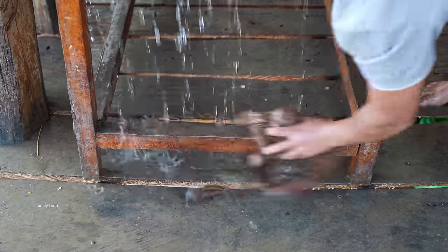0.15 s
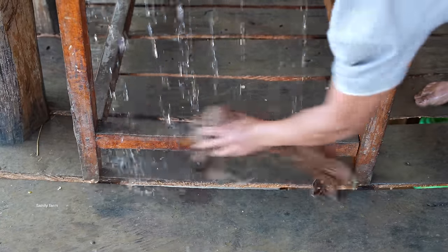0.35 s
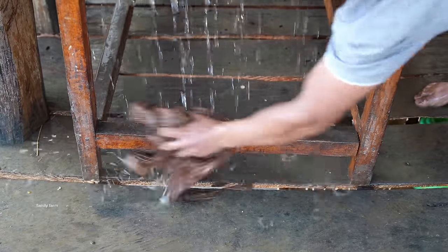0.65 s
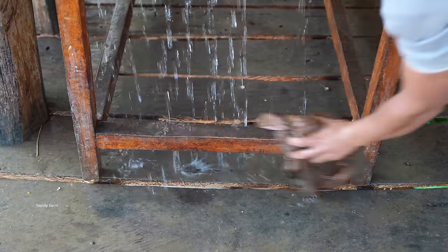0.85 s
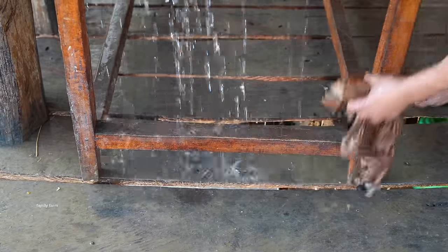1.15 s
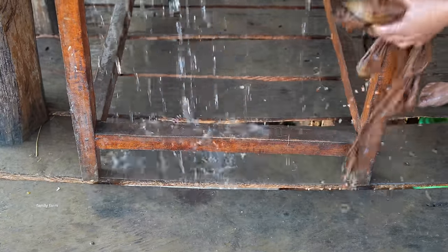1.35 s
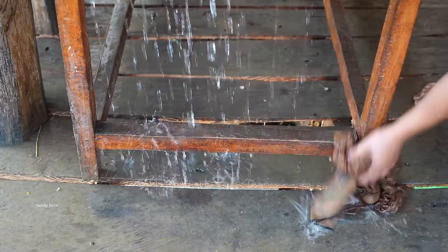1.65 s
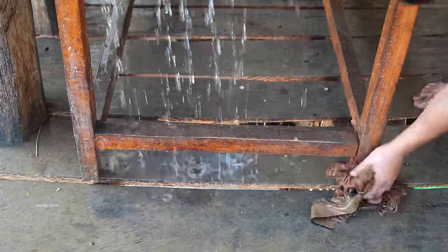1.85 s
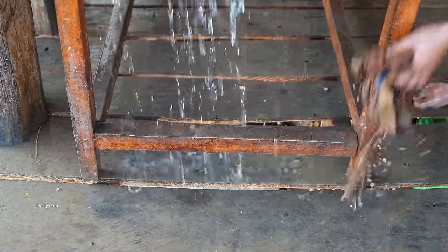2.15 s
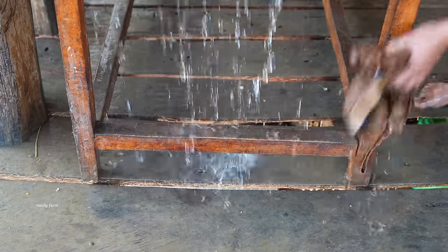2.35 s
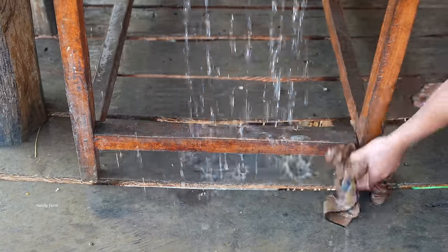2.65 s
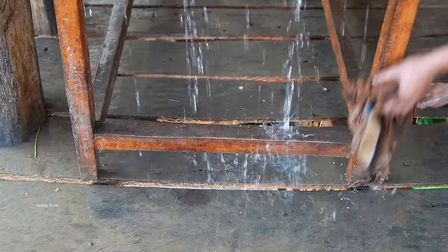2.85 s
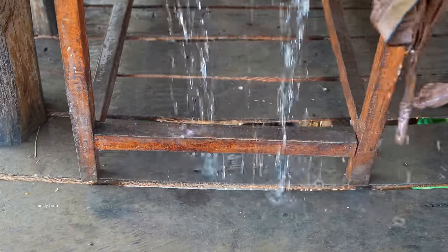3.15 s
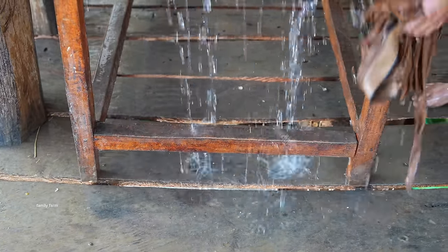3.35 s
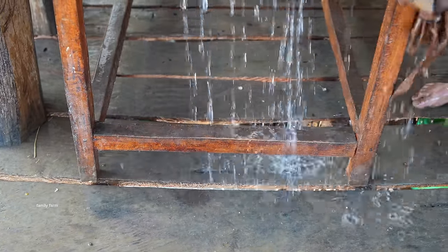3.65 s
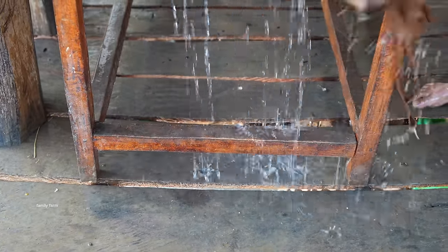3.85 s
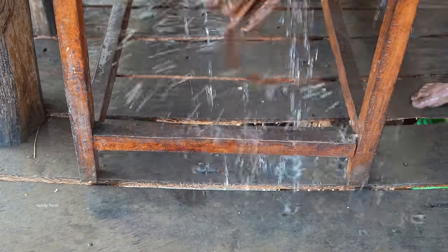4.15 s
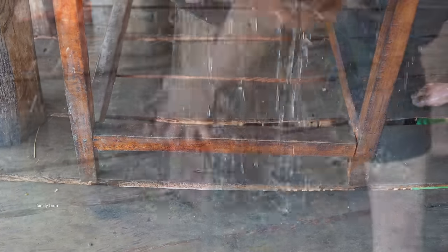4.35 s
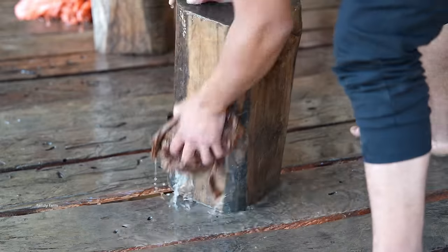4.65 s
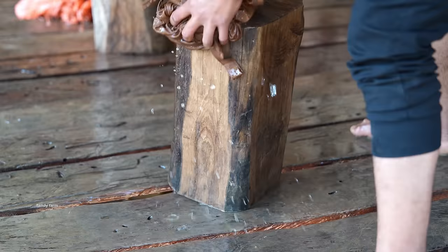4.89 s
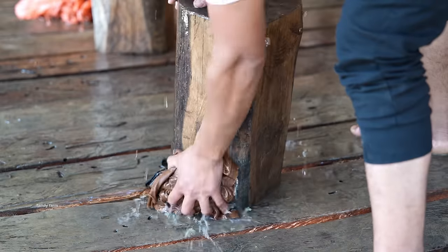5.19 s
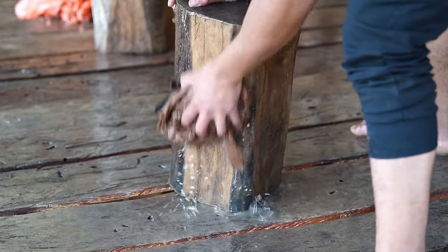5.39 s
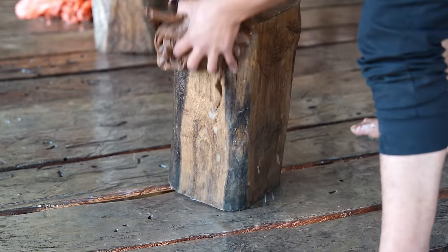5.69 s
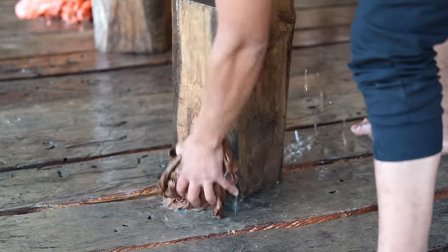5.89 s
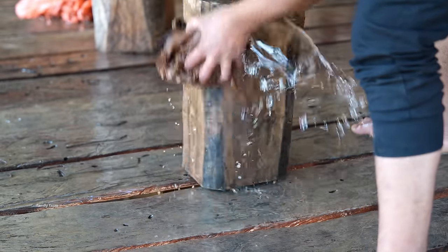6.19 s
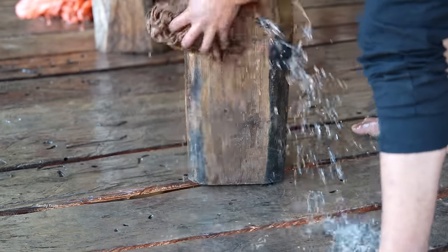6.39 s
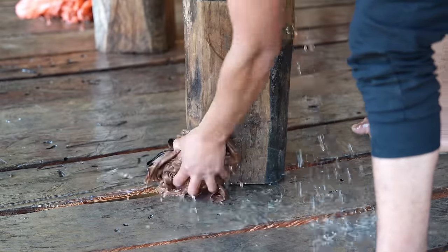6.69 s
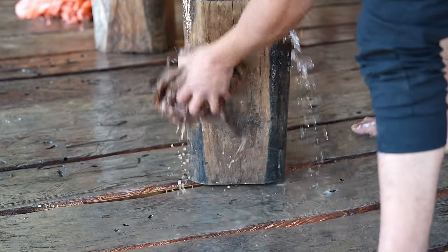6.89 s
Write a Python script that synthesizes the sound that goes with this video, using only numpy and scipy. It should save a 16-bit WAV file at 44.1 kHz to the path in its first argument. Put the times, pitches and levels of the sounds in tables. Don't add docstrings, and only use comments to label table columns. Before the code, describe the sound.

Outdoors on a covered plank veranda, hose water drums on a wooden table and floor, with close drops slapping, ticking and knocking while a wet rag wipes the wood. Low gusts of wind rumble against the microphone. After a few dull wood bumps the water swings away, leaving faint trickle, a wet rag slapping a log and flinging droplets, a nearby hen clucking and thin chick peeps.

```python
import sys
import numpy as np
from scipy import signal
from scipy.fft import rfft, irfft, next_fast_len
from scipy.io import wavfile
from scipy.ndimage import uniform_filter1d, minimum_filter1d, map_coordinates

SR = 44100
rng = np.random.default_rng(int(sys.argv[2]) if len(sys.argv) > 2 else 0)


def ratio_of_db(decibels):
    return 10 ** (np.asarray(decibels, float) / 20)


def persist_wave(psi):
    counts = np.round(np.clip(psi, -1, 1) * 32767).astype(np.int16)
    wavfile.write(sys.argv[1], SR, np.atleast_2d(counts).T)


N = 310023
TIME = np.arange(N) / SR
CHANGE_S = 4.69


def unit(x):
    return x / np.sqrt(np.mean(x ** 2) + 1e-20)


def curves(rows):
    s, *cols = np.transpose(rows)
    return [np.interp(TIME, s, c) for c in cols]


def swells(events, width_s):
    return sum(db * np.exp(-((TIME - s) / width_s) ** 2 / 2) for s, db in events)


def wobble(knots_per_s):
    knots = rng.standard_normal(int(N * knots_per_s / SR) + 4)
    return map_coordinates(knots, [TIME * knots_per_s])


def coloured(x, spectrum):
    m = 2 * next_fast_len(N // 2 + SR // 2)
    hz, db = np.transpose(spectrum)
    grid_hz = np.fft.rfftfreq(m, 1 / SR)
    gain_db = np.interp(np.log(grid_hz + 1), np.log(hz + 1), db)
    ceps = irfft(np.log(ratio_of_db(gain_db) + 1e-4), m)
    ceps[1:m // 2] *= 2
    ceps[m // 2 + 1:] = 0
    return irfft(rfft(x, m) * np.exp(rfft(ceps)), m)[:N]


def fading(x, t60_s):
    return signal.lfilter([1], [1, -ratio_of_db(-60 / (t60_s * SR))], x)


def drops(rate_per_s, spread_db):
    hits = rng.random(N) < rate_per_s / SR
    return hits * ratio_of_db(spread_db * np.minimum(rng.exponential(size=N), 4))


def patches(x, depth_db):
    z = signal.stft(x, nperseg=256)[2]
    field = uniform_filter1d(rng.standard_normal(z.shape), size=4, axis=0)
    field = uniform_filter1d(field, size=14, axis=1)
    return signal.istft(z * ratio_of_db(depth_db * unit(field)), nperseg=256)[1][:N]


def room(x, t60_s):
    t = TIME[:SR // 2]
    tail = rng.standard_normal(len(t)) * ratio_of_db(-60 * t / t60_s)
    return signal.fftconvolve(x, tail / np.linalg.norm(tail))[:N]


# start_s, level_db, small_over_big_eddies_db
WIND = [(0.0, -20, 9.5), (0.15, -45.5, 10), (0.33, -31.5, 2), (0.57, -26, -12.5), (0.62, -16, 4),
        (0.92, -24, -0.5), (2.08, -23, -0.5), (2.11, -21, -9), (2.43, -8.5, -2), (2.58, -42, -3),
        (3.41, -32.5, -4.5), (4.11, -48.5, -10), (4.32, -14, 5), (5.66, -14, 5.5), (5.8, -25.5, -5),
        (5.95, -11, 5.5), (6.99, -44, 2.5), (7.03, -36, -5)]
# start_s, over_strength_db
PUFFS = [(.42, 8.5), (.87, 10), (1.13, -10), (1.35, 0.5), (1.6, -3.5), (1.88, 3), (2.55, 12), (2.85, 8),
         (3.5, 5), (3.64, -12.5), (3.8, 1), (4.03, 12.5), (4.65, -1.5), (4.82, 4), (5.0, 0), (5.58, -3.5),
         (6.15, -0.5), (6.28, 5.5), (6.7, 8.5)]
# freq_hz, density_db_per_hz
HEAVE = [(2.4, -38), (4.0, 3), (24, -3), (31, -36.5), (53, -120)]
BUFFET = [(13, -41.5), (22, 10.5), (34, 3), (66, -14), (86, -23), (150, -120)]
THUD = [(35, -31.5), (60, -2), (94, -3), (156, -22), (205, -29), (240, -28.5), (310, -93), (530, -120)]
# usual_level_db, growth_db_per_db, eddy_share_db_per_db
GUSTING = [
    (-12, 0.58, -0.59),
    (-17.5, 0.88, 0.11),
    (-35.5, 0.47, 0.97),
]
USUAL_DB = -20


def wind():
    strength_db, eddy_db = curves(WIND)
    puff_db = swells(PUFFS, width_s=0.041)
    x = np.zeros(N)
    for (usual_db, grows, share), colour, lump_db in zip(GUSTING, (HEAVE, BUFFET, THUD), (1.5, 3.5, 4.5)):
        level_db = usual_db + puff_db + grows * (strength_db - USUAL_DB) + share * eddy_db
        noise = coloured(rng.standard_normal(N), colour)
        x += ratio_of_db(level_db) * unit(ratio_of_db(lump_db * wobble(17)) * noise)
    return x


# start_s, flow_db, spray_fineness_db
WATER = [(0, 4, -5.5), (.8, 1.5, -4.5), (1.3, 1, -3), (1.7, 3.5, -5.5), (2.5, 2, -1), (3.05, -0.5, -2.5),
         (3.4, -1.5, 4.5), (3.85, 2.5, -2), (4.35, 4, -5), (4.68, -2.5, 2.5), (4.7, -14.5, 0),
         (5.1, -13, -4.5), (5.6, -17, 0.5), (6.05, -14, -6.5), (6.4, -18, 1.5), (7.03, -19.5, -2.5)]
# start_s, depth_db
LULLS = [(.25, 4.5), (.58, 2.5), (1.0, 4.5), (1.421, 6), (1.88, 6.5), (2.3, 4.5), (2.68, 8), (3.27, 0),
         (3.55, 0), (4.15, 4.5)]


def stream():
    flow_db, fine_db = curves(WATER)
    return flow_db, fine_db, swells(LULLS, width_s=0.059)


def shower(colour, shared, rate_per_s, spread_db, t60_s, hiss, patchy_db):
    trail = unit(fading(shared + drops(rate_per_s, spread_db), t60_s)) * rng.standard_normal(N)
    blur = hiss * ratio_of_db(1.0 * wobble(14)) * patches(rng.standard_normal(N), patchy_db)
    return unit(coloured(blur + trail, colour))


# freq_hz, density_db_per_hz
PLANKS = [(65, -23), (110, 4), (129, -5), (162, -2), (464, -5.5), (1200, -7.5), (1560, -41), (2640, -120)]
PUDDLE = [(650, -24), (1100, -9), (1590, -7.5), (2200, -13.5), (2860, -31), (4840, -120)]
SPLASH = [(1240, -16.5), (2100, -3.5), (3350, 4.5), (4520, -5), (5200, -13.5), (6760, -7), (11400, -120)]
SPRAY = [(2710, -11.5), (4600, -8), (5030, -1.5), (6740, -1), (7490, 0.5), (14900, -12.5), (15700, -20),
         (16300, -32)]
# level_db, lull_share_db_per_db, fineness_share_db_per_db
SHOWERS = [
    (-37, 0.86, 0.11),
    (-41, 1.73, -0.58),
    (-35.5, 0.96, 0.42),
    (-39, 0.11, 1.0),
]


def showers():
    flow_db, fine_db, lull_db = stream()
    levels_db = [db + flow_db - dip * lull_db + fine * fine_db for db, dip, fine in SHOWERS]
    planks_db, puddle_db, splash_db, spray_db = levels_db
    big = drops(60, 6.4)
    x = ratio_of_db(planks_db + 1.5) * shower(PLANKS, 0.47 * big, rate_per_s=120, spread_db=4.0, t60_s=0.16,
                                      hiss=1.5, patchy_db=2.5)
    x += ratio_of_db(puddle_db) * shower(PUDDLE, 0.67 * big, rate_per_s=290, spread_db=6.5, t60_s=0.053,
                                 hiss=1.24, patchy_db=4.5)
    x += ratio_of_db(splash_db + 1.0) * shower(SPLASH, 1.17 * big, rate_per_s=170, spread_db=6.0, t60_s=0.03,
                                       hiss=1.62, patchy_db=3.5)
    spray = shower(SPRAY, 0.4 * big, rate_per_s=260, spread_db=3.2, t60_s=0.007,
                   hiss=0.8, patchy_db=1.5)
    dull = unit(signal.lfilter(*signal.butter(2, 8000, fs=SR), spray))
    return x + ratio_of_db(spray_db + 1.5) * np.where(TIME < CHANGE_S, spray, dull)


# rate_per_s, usual_hz, spread_octaves, ring_cycles, over_flow_db
DROPLETS = [
    (154, 7200, .45, 4.6, -44.5),
    (71.3, 3020, 0.33, 8.3, -39.5),
    (38.7, 1100, 0.573, 16.3, -39),
]


def spatter():
    flow_db, _, lull_db = stream()
    x, t = np.zeros(N + SR), TIME[:700]
    for rate_per_s, usual_hz, octaves, cycles, db in DROPLETS:
        draw = rng.random((2000, 3))[:round(rate_per_s * N / SR)]
        at = (draw[:, 0] * (N - 1)).astype(int)
        hz = np.minimum(usual_hz * 2 ** (octaves * 3.43 * (draw[:, 1:2] - 0.5)), 15000)
        size_db = db + (flow_db - lull_db)[at] - 3.8 * np.log(draw[:, 2] + 0.046)
        decay = ratio_of_db(-60 * t * hz / (3 * cycles))
        plink = ratio_of_db(size_db)[:, None] * decay * np.sin(2 * np.pi * hz * t)
        x += np.bincount((at[:, None] + np.arange(len(t))).ravel(), plink.ravel(), N + SR)
    return x[:N]


def blows(events, colour, cycles, tail_db, sharp):
    x, t = np.zeros(N + SR), TIME[:SR // 4]
    grains = 5.1 + fading(drops(400, 4.85), 0.028)
    carrier = unit(coloured(rng.standard_normal(N) * grains, colour))
    carrier = np.pad(carrier, (0, SR), "wrap")
    for start_s, db, hz, t60_s in events:
        part = carrier[round(start_s * SR):][:len(t)]
        patter = 0.9 * part + unit(signal.lfilter(*signal.iirpeak(hz, sharp, SR), part))
        decay = ratio_of_db(4 + 60 / cycles - 60 * t * hz / cycles)
        ring = decay * (1 - np.exp(-t * hz)) * np.sin(2 * np.pi * hz * t)
        tail = ratio_of_db(tail_db - 60 * t / max(t60_s, 0.02)) * patter
        x[round((start_s + 0.0008) * SR):][:len(t)] += ratio_of_db(db) * (ring + tail)
    return x[:N]


def wood_blows(events):
    return blows(events, PLANKS[:-2] + PUDDLE[2:], cycles=26, tail_db=-16, sharp=5)


def splash_blows(events):
    return blows(events, SPLASH, cycles=7.5, tail_db=-21, sharp=3.1)


def spray_blows(events):
    return blows([(*event, 0.07) for event in events], SPRAY, cycles=8, tail_db=-21, sharp=3)


def cracks(events, top_hz):
    start_s, db = np.transpose(events)
    at = np.round((start_s + 0.0008) * SR).astype(int)
    spikes = np.bincount(at, ratio_of_db(db + 6), N)
    snap = (fading(spikes, 0.002) + 0.056 * fading(spikes, 0.061)) * np.sign(rng.standard_normal(N))
    return signal.lfilter(*signal.butter(2, [8000, top_hz], "band", fs=SR), snap)


# start_s, peak_db, ring_hz
SLAPS = [(0.168, -12, 3670), (0.416, -15, 3380), (0.5202, -11, 3100), (0.575, -10.5, 3300),
         (0.7056, -12.5, 3600), (0.8924, -8.5, 2770), (1.4288, -16.5, 3460), (1.509, -12.5, 3700),
         (1.6556, -12, 3500), (1.6672, -9.5, 2680), (1.8072, -12.5, 3270), (1.998, -18, 4010),
         (2.0483, -6.5, 3130), (2.2461, -12.5, 3540), (2.353, -14.5, 2360), (2.4646, -9, 2980),
         (2.478, -10.5, 2870), (2.4847, -13.5, 2950), (2.702, -16, 3600), (2.7295, -14, 3420),
         (2.7966, -9.5, 2760), (3.1589, -9.5, 3500), (3.342, -12.5, 3700), (3.3645, -12, 3830),
         (3.4533, -16.5, 3640), (3.6349, -8.5, 2380), (3.6432, -9, 3260), (3.7486, -8.5, 3600),
         (4.5012, -15, 3640), (4.5955, -14, 3210),
         (0.0662, -20, 2420), (0.309, -19, 2430), (0.3134, -17, 2380), (1.1019, -22, 3040),
          (1.1318, -26, 3090), (1.273, -19, 3550), (1.2784, -19, 3260), (1.6365, -17, 3100),
          (1.6958, -20, 2450), (2.306, -22, 2470), (2.3231, -19, 3910), (2.4219, -25, 3420),
          (2.5282, -18, 2860), (3.266, -31, 3660), (3.3544, -16, 3860), (3.4328, -22, 3300),
          (3.5907, -26, 3050), (3.6072, -19, 3280), (3.6504, -22, 3470), (3.7145, -29, 3260),
          (3.7334, -21, 3360), (3.8531, -29, 2990), (4.025, -23, 3360), (4.135, -20, 3440),
          (4.3306, -24, 2830), (4.5261, -20, 3400), (4.5675, -27, 3320), (4.6533, -24, 3180)]


def slaps():
    return splash_blows([(s, db, hz, 0.16 * (3300 / hz) ** 0.42) for s, db, hz in SLAPS])


# start_s, peak_db, ring_hz
TICKS = [(0.23, -19, 7180), (0.3705, -17, 7700), (0.5196, -15, 8250), (0.5749, -16.5, 5700),
         (0.7474, -17, 6600), (0.8899, -16, 5940), (0.9847, -7.5, 7540), (1.273, -17.5, 6600),
         (1.4313, -7.5, 6700), (1.507, -18, 7260), (1.6673, -10, 7850), (1.7413, -13, 6550),
         (1.8181, -7.5, 7700), (1.9974, -10.5, 7600), (2.0477, -16.5, 6980), (2.2104, -13.5, 6260),
         (2.2426, -16, 7700), (2.39, -14.5, 6020), (2.5323, -13.5, 6800), (2.797, -17.5, 6840),
         (3.1619, -11.5, 6600), (3.342, -11.5, 6440), (3.4336, -12, 6640), (3.493, -16, 6280),
         (3.6087, -3.5, 6500), (3.8536, -16.5, 6830), (3.9488, -13, 8600), (4.1813, -12.5, 6960),
         (4.2929, -5.5, 7100), (4.368, -8, 8400)]
# start_s, peak_db, ring_hz
SPITS = [(0.118, -19, 6310), (0.1504, -30, 7460), (0.1834, -19, 7170), (0.3376, -29, 6830),
         (0.4933, -27, 7560), (1.0114, -28, 7520), (1.077, -29, 6120), (1.1313, -26, 7030),
         (1.1907, -27, 6600), (1.28, -19, 5550), (1.3574, -18.5, 6250), (1.3868, -17.5, 7100),
         (1.6057, -19.5, 6580), (1.615, -20, 6800), (1.655, -19.5, 6860), (1.6921, -23, 7550),
         (1.9055, -22, 7180), (2.1091, -24, 7620), (2.1314, -19.5, 5570), (2.3105, -21, 6760),
         (2.4204, -23, 8730), (2.5047, -22, 6050), (2.5224, -18, 6640), (2.569, -17.5, 6500),
         (2.621, -27, 7350), (2.6596, -25.5, 7130), (2.6873, -26, 7150), (2.7292, -24, 6800),
         (2.815, -35, 7020), (2.9726, -24, 8350), (3.2654, -24.5, 6150), (3.379, -24, 9000),
         (3.4114, -19, 7010), (3.7424, -18.5, 7160), (3.8044, -20.5, 5730), (3.817, -17, 6820),
         (3.8753, -15.5, 7560), (3.993, -19.5, 6950), (4.1953, -18, 7900), (4.4428, -22, 7420)]


def near_ticks():
    return TICKS + [(s, db + 2, hz) for s, db, hz in SPITS]


# start_s, peak_db
SNAPS = [(0.1506, -26), (0.1835, -39), (0.1835, -21), (0.3381, -23), (0.4938, -30), (0.5206, -20),
         (0.5751, -29), (0.8896, -18), (0.968, -21), (0.9847, -22), (1.0121, -20), (1.076, -27),
         (1.273, -25), (1.358, -21), (1.6062, -31), (1.6147, -24), (1.657, -16), (1.6671, -14),
         (1.6921, -22), (1.8173, -25), (1.9051, -25), (1.9973, -17), (2.1091, -20), (2.1316, -29),
         (2.2074, -31), (2.2376, -18), (2.2438, -32.5), (2.2436, -19), (2.3106, -28), (2.3106, -24),
         (2.39, -24.5), (2.4209, -31), (2.5052, -19), (2.5232, -22), (2.6599, -33), (2.9726, -30.5),
         (3.1428, -22), (3.1604, -20), (3.266, -23), (3.3418, -19.5), (3.379, -18.5), (3.4121, -20),
         (3.4356, -26), (3.493, -17), (3.5648, -34), (3.5867, -33), (3.6087, -24), (3.7429, -22),
         (3.8053, -22), (3.8167, -20), (3.8566, -30), (3.8764, -23), (3.9479, -14), (3.9923, -28),
         (4.1789, -26), (4.1954, -25), (4.2931, -32), (4.2935, -29), (4.368, -16), (4.4437, -23)]


def fine_drops():
    return spray_blows(near_ticks()) + cracks(SNAPS, top_hz=13500)


# start_s, peak_db, ring_hz, patter_t60_s
KNOCKS = [(0.638, -11, 1520, 0.077), (0.889, -27, 1610, 0.27), (1.636, -17, 1630, 0.37),
          (1.694, -25, 790, 0.13), (1.764, -17, 810, 0.4), (1.764, -21, 517.7, 0.07),
          (1.764, -19, 1250, 0.032), (2.485, -21, 1990, 0.65), (2.76, -27, 1780, 0.97),
          (2.942, -23, 1100, 0.25), (3.744, -25, 565, 0.34), (4.135, -23.5, 1150, 0.18),
          (.605, -35, 1450, .1), (1.268, -29, 840, .1), (3.54, -29, 1080, .1), (3.986, -22, 990, .1),
          (2.941, -30, 330, .1)]


def knocks():
    return wood_blows(KNOCKS)


# start_s, length_s, centre_hz, level_db
WIPES = [(0.5, 0.53, 1660, -32.5), (0.048, 0.21, 1852, -35), (0.41, 0.039, 2222, -31),
         (1.059, .06, 1500, -36.5), (1.149, 0.3, 910, -37.5), (5.368, 0.12, 1800, -48),
         (5.912, .03, 4200, -44), (5.925, .08, 3400, -43), (6.63, .07, 2300, -46), (5.185, .05, 900, -41)]


def rag_wipes():
    x = np.zeros(N)
    for start_s, length_s, hz, db in WIPES:
        u = np.arange(round(length_s * SR)) / (length_s * SR)
        hiss = unit(signal.lfilter(*signal.iirpeak(hz, 3.5, SR), rng.standard_normal(len(u))))
        x[round(start_s * SR):][:len(u)] += ratio_of_db(db) * hiss * np.sin(np.pi * u ** 0.77)
    return x * ratio_of_db(2.5 * wobble(90))


# start_s, length_s, pitch_hz, level_db
BUMPS = [(.39, 0.034, 185, -25), (0.396, 0.022, 288, -25), (4.45, 0.04, 185, -27.5),
         (0.929, 0.053, 129.5, -21.5), (1.7, 0.031, 141, -32), (2.07, 0.064, 158, -34),
         (4.28, 0.048, 188, -22), (4.29, 0.066, 94.2, -14.5), (4.369, 0.12, 79.5, -16),
         (5.43, .07, 210, -40), (5.945, 0.074, 208, -31), (6.281, 0.0017, 600, -30),
         (5.139, 0.013, 300, -28.5), (5.797, 0.52, 86, -26.5)]
# start_s, length_s, pitch_hz, level_db
POP = [
    (5.12, .03, 17, 6),
]


def bumps():
    x = np.zeros(N + SR)
    for start_s, length_s, hz, db in BUMPS + POP:
        t = TIME[:round(length_s * SR)]
        swell = np.sin(np.pi * (t / length_s) ** 0.78)
        x[round(start_s * SR):][:len(t)] += ratio_of_db(db) * np.sin(2 * np.pi * hz * t) * swell
    return x[:N]


# start_s, length_s, pitch_hz, level_db, throat_hz
CLUCKS = [(4.652, 0.13, 264, -37.5, 1020), (4.977, 0.12, 254.7, -35, 1020), (5.47, 0.12, 228.2, -35, 920),
          (6.027, 0.094, 226.3, -34, 920), (6.561, .13, 233.5, -34.5, 940), (4.284, 0.095, 242, -29.5, 924)]


def hen():
    x = np.zeros(N)
    for start_s, length_s, hz, db, throat_hz in CLUCKS:
        u = np.arange(round(length_s * SR)) / (length_s * SR)
        jitter = np.interp(u, np.linspace(0, 1, num=25), rng.normal(0, 0.13, size=25))
        cycles = np.cumsum(hz * (1.05 - 0.089 * u + jitter)) / SR
        pulses = np.diff(np.floor(cycles), prepend=0) * ratio_of_db(rng.normal(0, 3.4, len(u)))
        source = unit(pulses - pulses.mean()) + 0.45 * rng.standard_normal(len(u))
        # centre_hz, width_hz, gain_db
        tract = [(throat_hz, 60, 6), (1.1 * throat_hz, 320, -10),
                 (0.442 * throat_hz, 90, -7), (0.78 * throat_hz, 60, -4)]
        voice = sum(ratio_of_db(g) * signal.lfilter(*signal.iirpeak(c, c / w, SR), source) for c, w, g in tract)
        voice = signal.lfilter(*signal.butter(2, 1400, fs=SR), voice)
        swell = np.sin(np.pi * u ** 0.86) ** 2.2
        x[round(start_s * SR):][:len(u)] += ratio_of_db(db) * unit(voice) * swell
    return x + ratio_of_db(-5) * room(x, t60_s=0.25)


# start_s, length_s, top_hz, end_hz, level_db
PEEPS = [(4.64, .097, 5050, 3250, -51), (4.915, .135, 4850, 4000, -59), (5.065, .125, 5480, 3450, -52),
         (5.42, .07, 5480, 5350, -56), (5.48, .087, 5000, 3450, -54), (5.645, .05, 4600, 3800, -57),
         (5.8, .155, 5420, 4150, -56), (5.985, .075, 4620, 3850, -56), (6.25, .13, 5480, 4700, -58),
         (6.23, .12, 5020, 3800, -57), (6.39, .07, 4750, 3700, -56), (6.65, .152, 5500, 3900, -57),
         (6.68, .035, 4750, 4600, -61), (6.99, .04, 4900, 4750, -60), (5.49, .07, 5450, 5050, -55),
         (5.89, .05, 4400, 3650, -59), (6.29, .08, 5150, 4500, -58)]
# start_s, length_s, top_hz, end_hz, level_db
COO = [
    (5.82, 0.12, 573, 540, -52),
]


def peeps_and_coo():
    x = np.zeros(N + SR)
    quiver = 1 + 0.006 * wobble(150)
    for start_s, length_s, top_hz, end_hz, db in PEEPS + COO:
        u = np.arange(round(length_s * SR)) / (length_s * SR)
        hz = top_hz - (top_hz - end_hz) * u ** 3.2 - 0.04 * top_hz * (1 - u) ** 5
        hz = hz * np.resize(quiver[round(start_s * SR):], len(u))
        tone = np.sin(2 * np.pi * np.cumsum(hz) / SR)
        x[round(start_s * SR):][:len(u)] += ratio_of_db(db + 4 * u) * tone * np.sin(np.pi * u ** 1.2) ** 0.2
    x = x[:N] * ratio_of_db(2.5 + 1.8 * wobble(80))
    return x + ratio_of_db(-1) * room(x, t60_s=0.2)


# start_s, peak_db
THUMPS = [
    (4.796, -36),
    (5.186, -19.5),
    (5.928, -27),
    (6.654, -26),
]
# pitch_hz, level_db, patter_t60_s
LOG = [(1830, -3, 0.16), (850, -4, 0.28), (264, -13, 0.38), (517, -18, 0.36)]
SOFT_DULLS = 0.21
HARD_DB = -22


def rag_thumps():
    rings = []
    for start_s, db in THUMPS:
        for hz, level_db, t60_s in LOG:
            tilt_db = SOFT_DULLS * (db - HARD_DB) * np.log2(hz / LOG[-1][0])
            rings.append((start_s, db + level_db + tilt_db, hz, t60_s))
    return wood_blows(rings)


# start_s, slap_db, slap_hz, tick_db
FLUNG = [(4.9402, -30, 3400, -47), (5.186, -15, 3620, -23), (5.183, -34.5, 4000, -17),
         (5.383, -29, 3440, -51.5), (5.581, -27, 3830, -28), (5.93, -20.5, 2740, -19),
         (5.937, -34, 2200, -38), (5.97, -35, 3500, -42), (6.039, -28, 3570, -36), (6.2173, -32, 2860, -37),
         (6.6354, -34, 2650, -34), (6.641, -35, 3100, -33), (6.6557, -35, 3250, -24),
         (6.661, -40, 2500, -36), (6.766, -30, 3430, -47), (6.8945, -26, 4400, -36)]
# start_s, peak_db
FAR_SNAPS = [(4.7494, -43), (4.9462, -49), (5.1044, -45), (5.1838, -19), (5.1855, -16), (5.2024, -36),
             (5.244, -37), (5.4276, -42), (5.5099, -43), (5.5822, -46), (5.917, -35), (5.9305, -22),
             (5.9494, -44), (6.0377, -50), (6.3779, -38), (6.4135, -42), (6.6353, -46), (6.6353, -40),
             (6.655, -28), (6.6604, -40), (6.6884, -41), (6.777, -46), (6.8942, -50)]


def rag_flung():
    x = splash_blows([(s, db, hz, 0.28) for s, db, hz, _ in FLUNG])
    x += spray_blows([(s, tick_db, 7180) for s, _, _, tick_db in FLUNG])
    return x + cracks(FAR_SNAPS, top_hz=11500)


def scene():
    water = showers() + spatter() + slaps() + fine_drops() + knocks()
    rag = rag_wipes() + rag_thumps() + rag_flung()
    birds = hen() + peeps_and_coo()
    return np.tile(wind() + water + rag + bumps() + birds, (2, 1))


# start_s, length_s
SPLITS = [(.299, .015), (1.004, .03), (1.379, .04), (1.556, .035), (2.447, .015), (2.615, .017),
          (2.955, .073), (3.254, .01), (3.373, .028), (3.706, .04), (3.756, .084), (4.093, .08),
          (4.435, .035), (6.65, .009)]


def split(mono):
    hz, t, z = signal.stft(mono, SR, nperseg=256)
    side = np.zeros(z.shape)
    loud = [(s - 0.012, 0.018) for s, db, _ in near_ticks() if db > -16.2]
    for start_s, length_s in loud + SPLITS:
        filled = rng.random(len(hz))[np.arange(len(hz)) // 8] < 0.75
        low = (length_s > 0.045) * (hz > 300) * ratio_of_db(-24)
        depth = np.where(hz > 4700, filled * ratio_of_db(-7), low)
        side[:, abs(t - start_s - length_s / 2) < length_s / 2 + 0.003] = depth[:, None]
    level = uniform_filter1d(abs(z), size=3, axis=0) * side
    noise = np.exp(2j * np.pi * rng.random(z.shape))
    return signal.istft(level * noise, SR, nperseg=256)[1][:N]


def roll_off(x):
    return signal.sosfilt(signal.butter(12, 16460, fs=SR, output="sos"), x)


def record(dry):
    need = np.minimum(1, 0.99 / (abs(dry[0]) + 1e-9))
    gain = uniform_filter1d(minimum_filter1d(need, size=2600, origin=900), size=700)
    mono = signal.sosfilt(signal.ellip(8, 0.5, 50, 15800, fs=SR, output="sos"), dry[0] * gain)
    side = split(mono)
    return roll_off(np.array([mono + side, mono - side]))


dry = scene()
out = record(dry)
persist_wave(out)
```